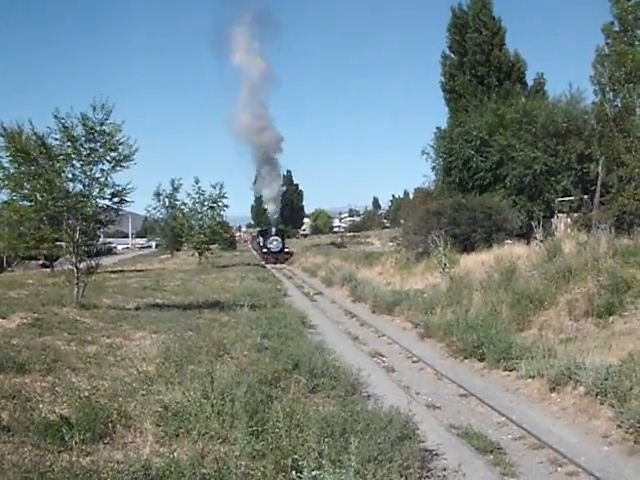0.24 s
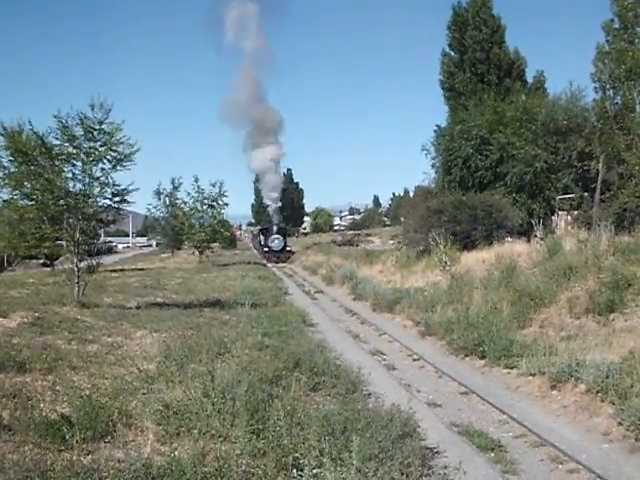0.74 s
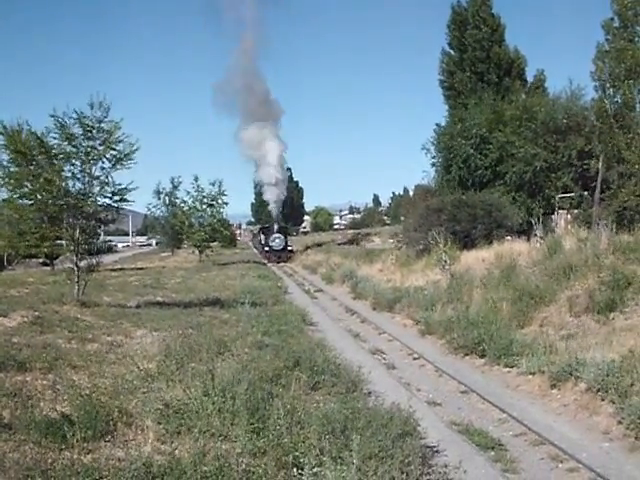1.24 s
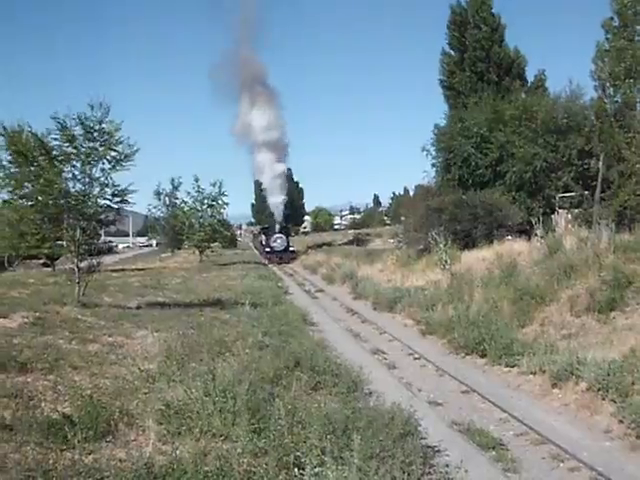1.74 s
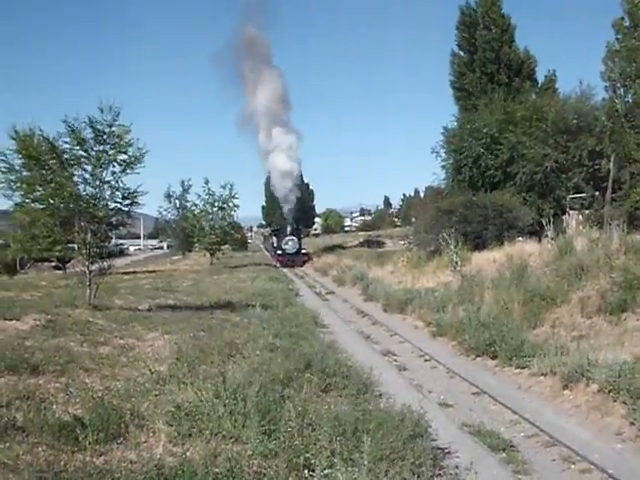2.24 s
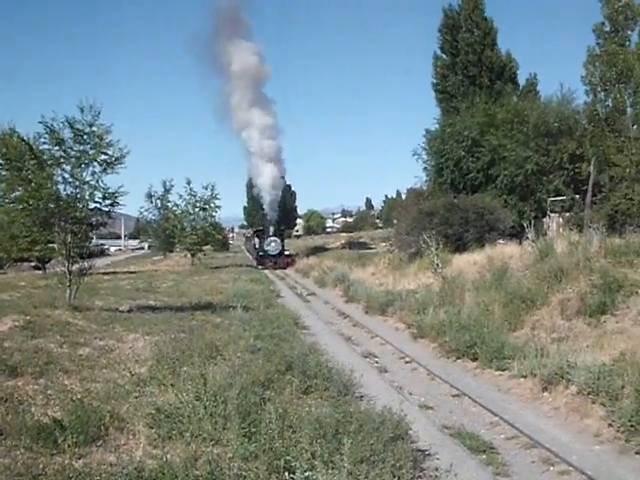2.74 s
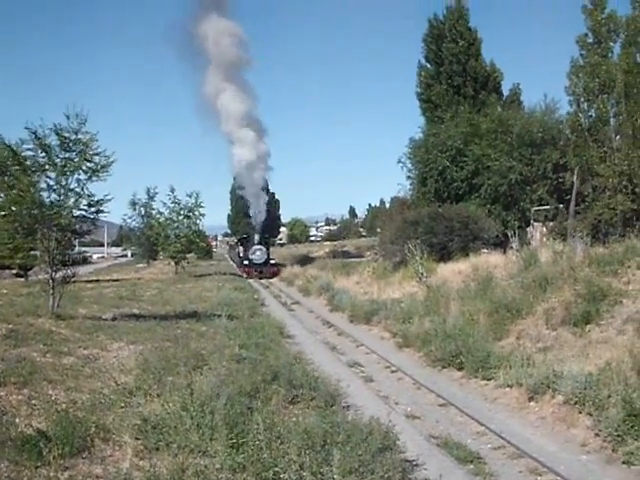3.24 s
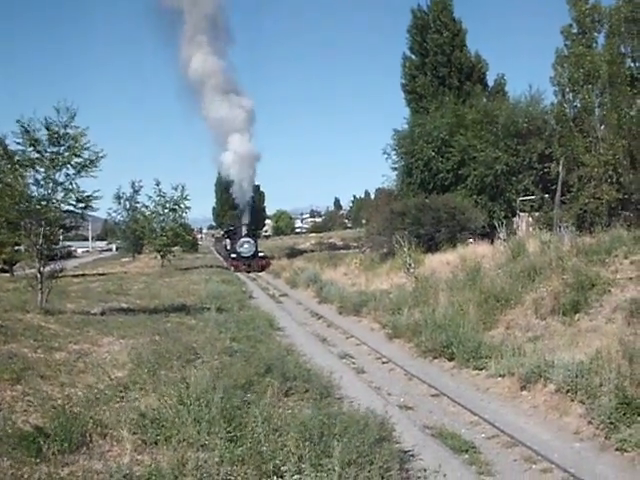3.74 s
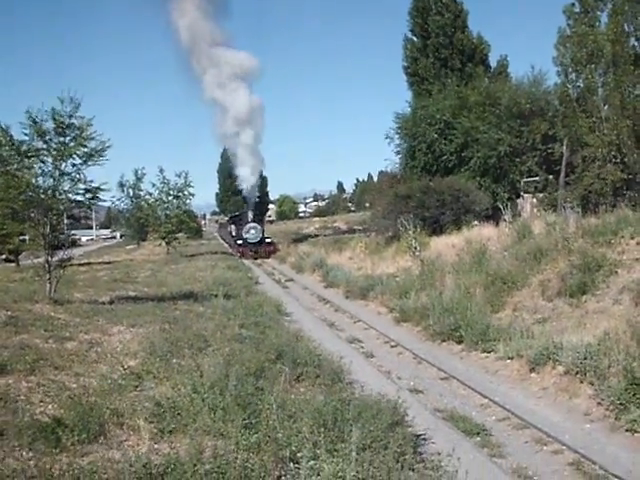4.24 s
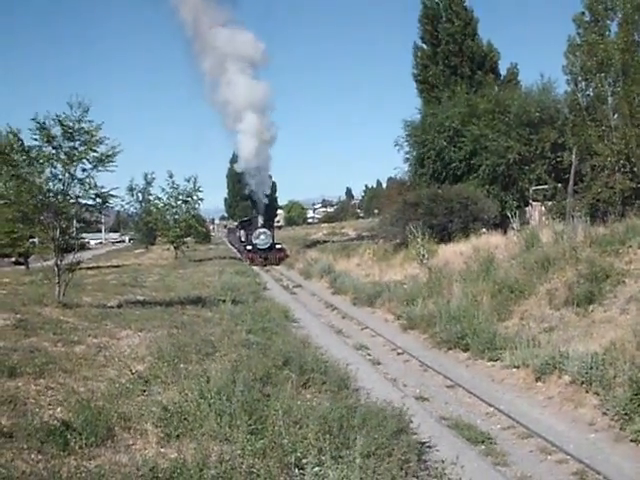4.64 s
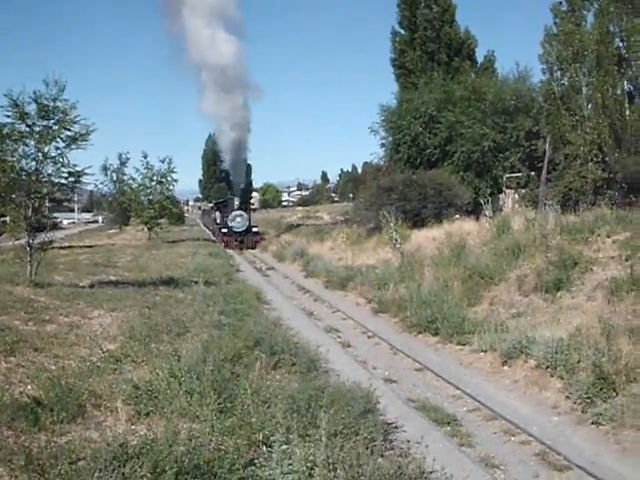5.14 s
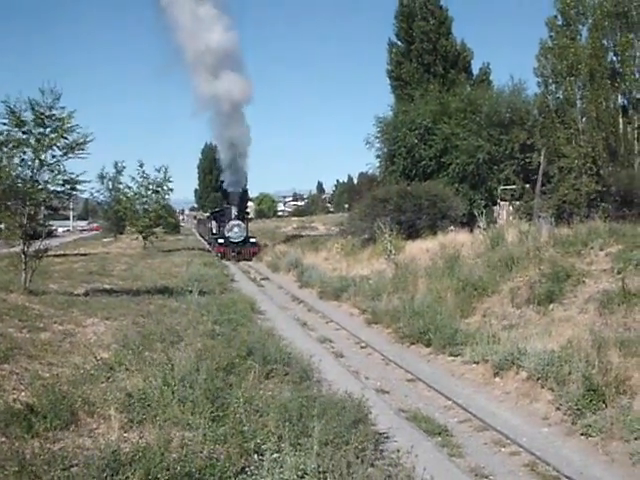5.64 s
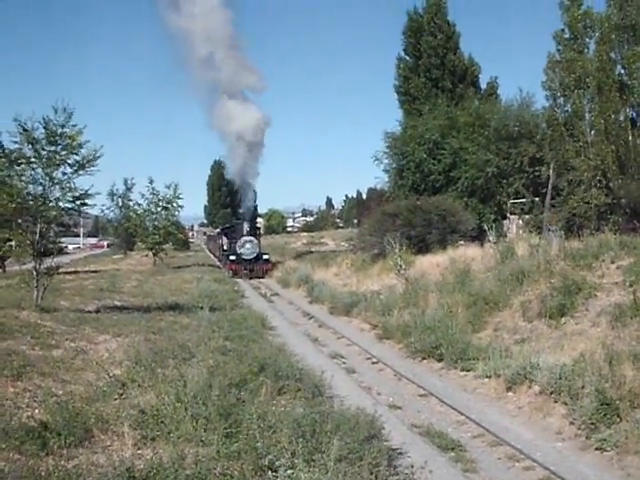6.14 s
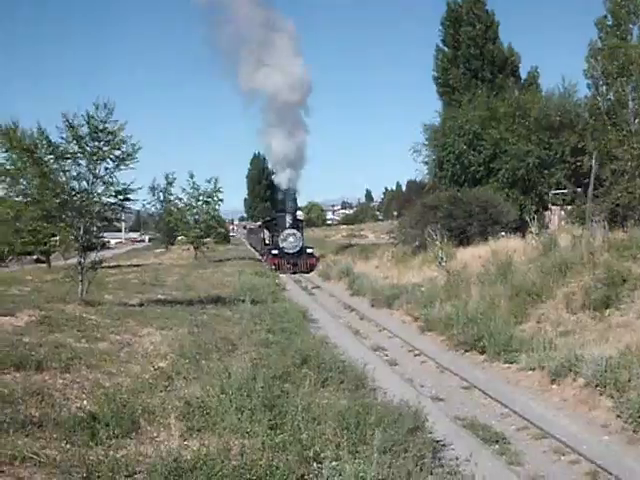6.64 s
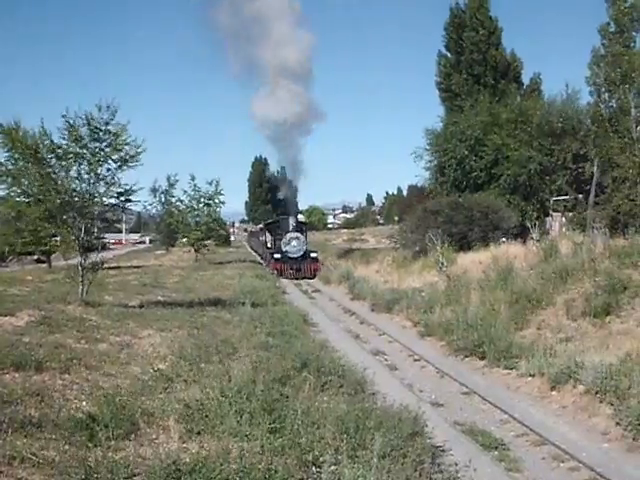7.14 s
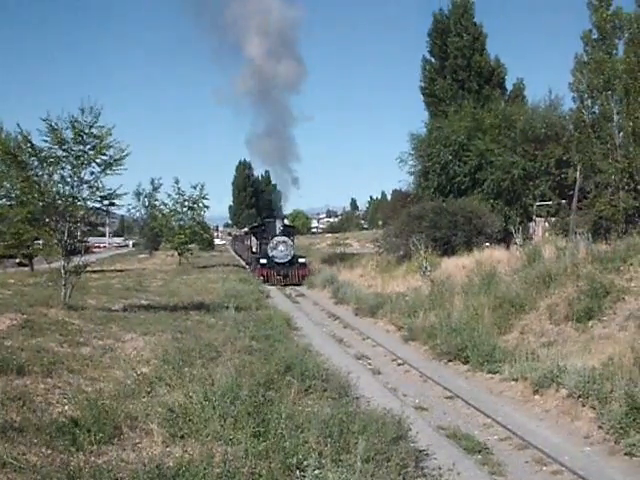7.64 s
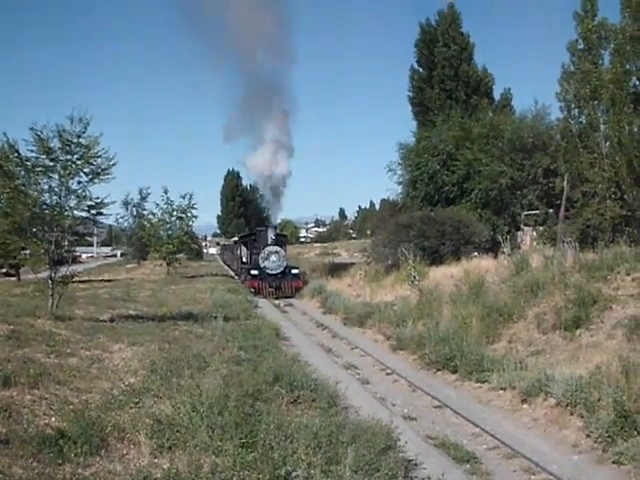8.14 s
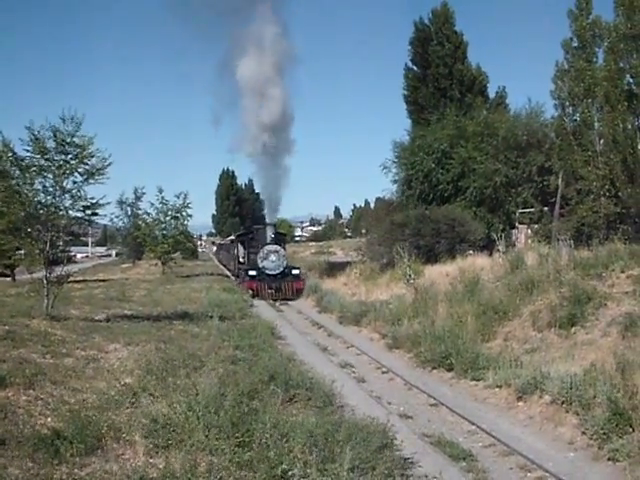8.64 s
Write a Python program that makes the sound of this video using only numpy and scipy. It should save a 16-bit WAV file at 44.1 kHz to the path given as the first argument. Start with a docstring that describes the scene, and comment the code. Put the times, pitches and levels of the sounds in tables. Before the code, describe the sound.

Distant at first, a little locomotive puffs in a fast four-beat cycle with slightly uneven accents, its chimney blasts ringing low and hollow. Constant steam hiss flutters in the treble around them. Over nine seconds both grow clearly louder as it nears, with a faint downward-sliding coloration from the ground reflection. Open air, dry, single microphone, with soft lumps of low wind and a dull rumble.

```python
"""A small steam locomotive works towards the microphone across open grassy ground.
At first it is soft: each exhaust beat blows up the chimney, noise and a wavering note ringing its resonances.
From the start, noise-made steam hisses without pause from the boiler top, wavering and spitting in the treble.
As the engine nears, both grow and the ground bounce lags further, so its notches slide down in pitch.
Low noise makes the wheel and fire rumble and the breeze on the microphone, in uneven low lumps."""
import sys
import numpy as np
from scipy import signal
from scipy.fft import rfft, irfft
from scipy.io import wavfile
from scipy.ndimage import uniform_filter1d, map_coordinates

SR = 44100
rng = np.random.default_rng(int(sys.argv[2]) if len(sys.argv) > 2 else 0)


def generate_wav(sig):
    """Save sig (samples, or channels by samples) to the path in sys.argv[1] as 16-bit PCM at SR."""
    pcm = np.round(np.clip(np.atleast_2d(sig).T, -1, 1) * 32767).astype(np.int16)
    wavfile.write(sys.argv[1], SR, pcm)


N = 392490

# Exhaust beats, nominal: centre t/s, chimney roar level/dB, chimney boom level/dB
EXHAUST_BEATS = [(0.082, -45, -43), (0.252, -43.5, -41), (0.442, -48.5, -44.5), (0.675, -46.5, -49.5),
                 (0.893, -46, -41), (1.058, -43, -43), (1.248, -48.5, -57), (1.465, -45.5, -43.5),
                 (1.688, -46, -42), (1.85, -42, -45), (2.054, -48, -40), (2.27, -46, -43.5),
                 (2.469, -43.5, -44), (2.647, -41.5, -38), (2.837, -46, -54), (3.06, -45.5, -41),
                 (3.252, -43, -49), (3.435, -42, -38.5), (3.612, -45, -42.5), (3.838, -45, -45.5),
                 (4.04, -43, -50), (4.211, -41.5, -39.5), (4.39, -45.5, -40.5), (4.609, -43, -37.5),
                 (4.827, -41.5, -43), (4.99, -40.5, -35), (5.17, -46.5, -37), (5.398, -42.5, -38.5),
                 (5.593, -42, -37), (5.767, -40.5, -39.5), (5.944, -44.5, -42), (6.154, -44.5, -38.5),
                 (6.368, -40, -34.5), (6.533, -36.5, -32), (6.723, -43, -33.5), (6.925, -39, -38),
                 (7.14, -39, -33), (7.288, -36.5, -29), (7.485, -42, -36), (7.684, -38.5, -34.5),
                 (7.888, -38.5, -32.5), (8.051, -33.5, -33), (8.248, -42, -33), (8.44, -37, -37),
                 (8.647, -36.5, -32.5), (8.823, -32.5, -36)]
# Four beats to a wheel turn, each with its own valve timing: length t/s, upper roar re roar level/dB
VALVE_STROKES = [(0.094, 0.5), (0.061, 0.6), (.058, -1), (0.061, 0)]
# Chimney resonances, from boom to upper roar: f/Hz, width f/Hz, relative level/dB
CHIMNEY_BOOM_MODES = [(99, 10, -11), (168, 22, 4), (211, 42, -8)]
CHIMNEY_THUD_MODES = [(278, 35, 0)]
CHIMNEY_ROAR_MODES = [(453, 59, -1.5), (521, 81, 2.5), (660, 243, -2.5)]
CHIMNEY_UPPER_MODES = [(915, 132, 4.5), (1060, 213, 1), (1222, 52, 0), (1680, 420, -4.5), (2087, 270, -2.5)]
# Escaping steam: t/s, level/dB, treble tilt/dB (phased in over the octave from 4 kHz, full above)
STEAM_COURSE = [(0.0, -42.5, -1.5), (0.25, -43, -4), (0.62, -41, 2), (0.84, -42, -1.0), (0.91, -46, -1.0),
                (1.53, -41.5, -2.5), (2.15, -40.5, -2), (2.75, -42.5, -3), (3.22, -40.5, -1.0),
                (3.67, -40.5, -1.5), (3.74, -37.5, 2.5), (4.21, -41.5, -1.5), (5.15, -37, 1.5),
                (5.4, -37, -3), (6.34, -34.5, 0), (6.37, -37, -1.0), (6.64, -37, -1.0), (6.67, -33, -1.0),
                (6.74, -36, 0), (7.19, -34.5, -2), (7.49, -36.5, -1.5), (8.25, -36.5, 0.5),
                (8.43, -35.5, 2), (8.9, -34, -0.5)]
# Colour of the steam jet: f/Hz, relative level per Hz/dB
STEAM_COLOUR = [(150, -6), (250, -9), (372, -9), (526, -13.5), (980, -2), (1320, -4), (2030, 0),
                (2820, -6.5), (3590, 2.5), (4900, 4), (8300, 1), (9800, -7.5), (11800, -26), (15600, -36)]
# Bounce off the grass: t/s, lag behind the direct sound t/ms, strength (0-1)
GROUND_BOUNCE = [(0, 0.78, 0.33), (2, 0.86, 0.43), (3.8, 0.95, 0.4), (4.8, 1.104, 0.4), (5.7, 1.13, 0.46),
                 (6.5, 1.194, 0.62), (8.9, 1.246, 0.5)]
# Breeze on the microphone: t/s, uneven level of the low wind noise/dB, before a further random swing
WIND_NOISE_COURSE = [(0.0, -39.5), (1.53, -34.5), (1.78, -48), (1.86, -37), (2.3, -41), (2.4, -34.5),
                     (3.22, -38.5), (3.35, -30.5), (3.77, -39.5), (5.9, -32.5), (6.77, -37), (7.29, -29),
                     (8.06, -33), (8.11, -26.5), (8.48, -39.5), (8.5, -26.5), (8.8, -31), (8.9, -24)]
# Colour of the wheel and fire rumble: f/Hz, relative level per Hz/dB
RUMBLE_COLOUR = [(29, -60), (50, -3), (113, -6.5), (177, -12), (292, -20), (348, -33.5), (400, -36),
                 (520, -40), (880, -120)]
# Peaks and dips from the body that holds the microphone: f/Hz, width f/Hz, gain/dB
MICROPHONE_BODY = [(315, 52, -2.5), (781, 130, -8.5), (1295, 102, -4), (1540, 174, 4), (1790, 94, -5),
                   (2385, 37, 6.5), (2790, 150, 4), (3080, 430, -1.5), (3610, 46, 6), (4120, 210, -5.5),
                   (4804, 100, 4.5)]

BOOM_LAG_S, BOOM_STRETCH = .012, 1.25   # the boom builds later and lasts longer than the roar
DRAUGHT = 0.05   # share of the boom's nominal power that the steady draught keeps up between beats
NOTE_HZ, NOTE_WANDER, NOTE_DB = 170.1, 0.04, -1.5   # the boom locks onto the blast; wander is a share of pitch
UPPER_SAG_DB_PER_S = 0.4   # the upper modes gain less than the roar as the engine nears
THUD_DB, THUD_SAG_DB_PER_S = -3.5, .9   # hollow mode above the boom, re roar at the start; it gains least
STEEPEN_DB = -26   # overtones from steepened wave fronts, re the steam level
GROUND_TURN = .3   # phase turn of soft ground, cycles
GROUND_CUT_HZ = 5200   # grass scatters the treble of the bounce
WIND_SWING_DB = 1.5   # further random swing of the low wind noise
RUMBLE_DB, RUMBLE_RISE_DB_PER_S = -47, .5   # starting level of the rumble, growing as the train nears
SELF_NOISE_DB, OFFSET, CUTOFF_HZ = -83, .0094, 15745   # hiss and offset enter ahead of the top cut


def exhaust():
    """The blast drives the chimney modes; the boom rings sharpest, builds later and never quite stops."""
    centre, roar_db, boom_db = np.transpose(EXHAUST_BEATS)
    stroke_db = np.resize(np.transpose(VALVE_STROKES)[1], len(EXHAUST_BEATS))
    upper_db = roar_db + stroke_db - UPPER_SAG_DB_PER_S * centre
    thud_db = roar_db + THUD_DB - THUD_SAG_DB_PER_S * centre

    draught_power = DRAUGHT * from_db(2 * np.interp(np.arange(N) / SR, centre, boom_db))
    blast = np.sqrt(puffs(boom_db, BOOM_LAG_S, BOOM_STRETCH) ** 2 + draught_power)
    note_hz = NOTE_HZ * (1 + NOTE_WANDER * drift(7.9))
    note = np.sin(2 * np.pi * np.cumsum(note_hz) / SR)
    boom = band(resonate(blast * rng.standard_normal(N), CHIMNEY_BOOM_MODES), 71, 246)
    boom = boom + from_db(NOTE_DB) * band(blast * note, 118, 225)

    roar = resonate(puffs(roar_db) * rng.standard_normal(N), CHIMNEY_ROAR_MODES)
    upper = resonate(puffs(upper_db) * rng.standard_normal(N), CHIMNEY_UPPER_MODES)
    thud = resonate(puffs(thud_db) * rng.standard_normal(N), CHIMNEY_THUD_MODES)
    return boom + thud + roar + upper


def puffs(level_db, lag_s=0, stretch=1):
    """A flat-topped, ragged swell of turbulent flow for every beat, with a weak dying tail."""
    centre = np.transpose(EXHAUST_BEATS)[0]
    length = np.resize(np.transpose(VALVE_STROKES)[0], len(EXHAUST_BEATS))
    power, t = np.zeros(N), np.arange(N) / SR
    for s, span, gain in zip(centre + lag_s, length * stretch, from_db(level_db)):
        near = slice(max(int((s - 3 * span) * SR), 0), int((s + 3 * span) * SR))
        power[near] += gain ** 2 * np.exp(-np.abs(2 * (t[near] - s) / span) ** 2.63)
    r = np.exp(-1 / (.06 * SR))   # the tail dies over 60 ms
    power = power + 0.34 * signal.lfilter([1 - r], [1, -r], power)
    return np.sqrt(power) * from_db(1.8 * drift(55))


def resonate(x, modes):
    """Parallel resonances with alternating signs, scaled so that unit noise comes out near rms 1."""
    out, power = 0, 0
    for k, (hz, width, level_db) in enumerate(modes):
        r = np.exp(-np.pi * width / SR)
        feedback = [1, -2 * r * np.cos(2 * np.pi * hz / SR), r * r]
        ringing = signal.lfilter([(1 - r * r) / 2, 0, (r * r - 1) / 2], feedback, x)
        out = out + (-1) ** k * from_db(level_db) * ringing
        power += from_db(2 * level_db) * np.pi * width / SR
    return out / np.sqrt(power)


def steam():
    """A bright jet; moving air makes all of it waver, the treble most, and each band flicker on its own."""
    level_db, bright_db = in_time(STEAM_COURSE)
    jets = [coloured(STEAM_COLOUR), coloured(STEAM_COLOUR)]
    edges = np.geomspace(200, 16500, 31)
    together, spitting = drift(14.6), drift(100)
    jet = 0
    for k, (low, high) in enumerate(zip(edges, edges[1:])):
        treble_share = np.clip(np.log2(high / 4000.), 0, 1)
        own_db = 1.4 * drift(1.6) + 1.91 * drift(44)
        waver_db = treble_share * (bright_db + 0.6 * spitting) + 0.76 * together + own_db
        jet = jet + band(jets[k % 2], low, high) * from_db(waver_db)   # neighbours get unrelated noise
    return from_db(level_db) * (jet + from_db(STEEPEN_DB) * crackle(jet))


def crackle(jet):
    """Loud peaks of the jet steepen near the nozzle into sharp overtones, in step with its momentary level."""
    level = np.sqrt(uniform_filter1d(jet ** 2, size=1800))
    overtones = jet ** 2 / level
    return rms_one(band(band(overtones, 8800, 19000), 8800, 19000))


def ground(x):
    """Direct sound plus a later, duller, phase-turned bounce; their interference cuts notches."""
    lag_ms, strength = in_time(GROUND_BOUNCE)
    hz = np.arange(N // 2 + 1) * SR / N
    reflection = np.exp(2j * np.pi * GROUND_TURN) / (1 + (hz / GROUND_CUT_HZ) ** 6)
    bounce = irfft(rfft(x) * reflection, N)
    late = map_coordinates(bounce, [np.arange(N) - lag_ms * SR / 1000], order=3)
    return x - np.clip(strength, 0, 1) * late


def breeze():
    """Lumpy low wind noise on the microphone over the low rumble of wheels and fire."""
    wind_db, = in_time(WIND_NOISE_COURSE)
    lumps = rms_one(band(band(rng.standard_normal(N), 16.0, 46.0), 3.5, 105))
    wind_noise = from_db(wind_db + WIND_SWING_DB * drift(5.4)) * lumps
    rumble_db = RUMBLE_DB + RUMBLE_RISE_DB_PER_S * np.arange(N) / SR
    rumble = from_db(rumble_db + 1.85 * drift(11)) * coloured(RUMBLE_COLOUR)
    return wind_noise + rumble


def coloured(spectrum):
    """Noise of rms 1 with the given spectrum, interpolated over log frequency."""
    hz, level_db = np.transpose(spectrum)
    bins = np.maximum(np.arange(N // 2 + 1) * SR / N, 1)
    gain = from_db(np.interp(np.log(bins), np.log(hz), level_db))
    return rms_one(irfft(rfft(rng.standard_normal(N)) * gain, N))


def drift(rate):
    """Slow random wander of spread near 1, changing about rate times a second."""
    r = np.exp(-80 * np.pi * rate / SR)   # worked out at every 40th sample
    slow = signal.lfilter([1], [1, -2 * r, r * r], rng.standard_normal(N // 40 + 2002))[2000:]
    return np.interp(np.arange(N) / 40, np.arange(len(slow)), rms_one(slow))


def band(x, low_hz, high_hz):
    """Band-pass."""
    return signal.sosfilt(signal.butter(2, [low_hz, high_hz], "band", fs=SR, output="sos"), x)


def in_time(rows):
    """Columns of a curve table, one value per sample."""
    s, *columns = np.transpose(rows)
    return [np.interp(np.arange(N) / SR, s, c) for c in columns]


def from_db(db):
    """Decibels to gain."""
    return 10 ** (np.asarray(db) / 20)


def rms_one(x):
    """Scale to rms 1."""
    return x / np.sqrt(np.mean(x ** 2) + 1e-20)


def scene():
    """Locomotive heard over the ground, with breeze and rumble beneath."""
    return (ground(exhaust() + steam()) + breeze())[None]


def record(dry):
    """Microphone body peaks and dips, amplifier hiss, a steady offset, a steep cut at the top."""
    for hz, width, gain_db in MICROPHONE_BODY:
        a, w = from_db(gain_db / 2), 2 * np.pi * hz / SR
        k = np.sin(w) * width / hz / 2
        dry = signal.lfilter([1 + k * a, -2 * np.cos(w), 1 - k * a], [1 + k / a, -2 * np.cos(w), 1 - k / a], dry)
    hiss = from_db(SELF_NOISE_DB) * rng.standard_normal(N)
    top_cut = signal.ellip(18, .5, 55, CUTOFF_HZ, fs=SR, output="sos")
    return signal.sosfilt(top_cut, dry + hiss + OFFSET)


dry = scene()
out = record(dry)
generate_wav(out)
```